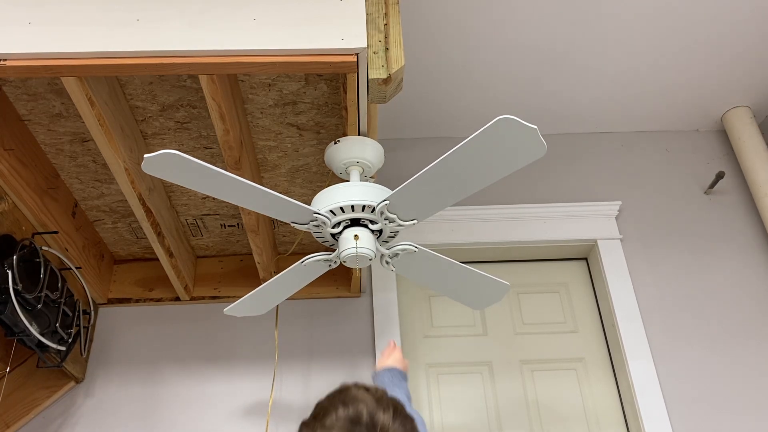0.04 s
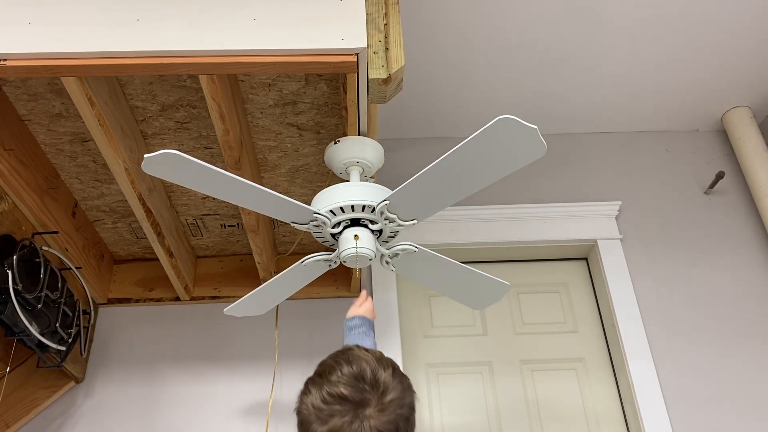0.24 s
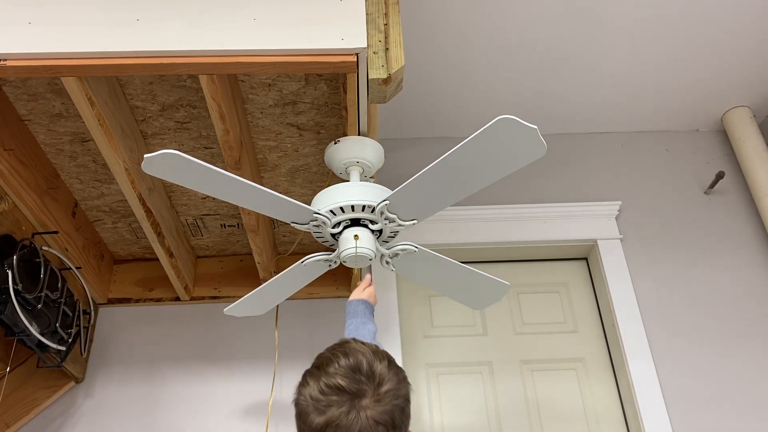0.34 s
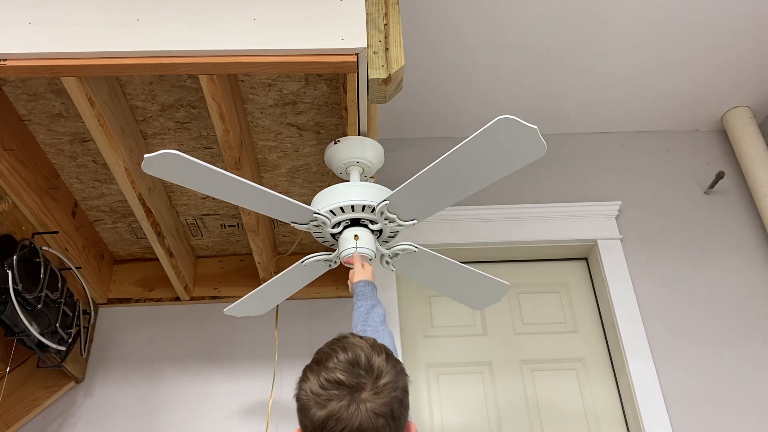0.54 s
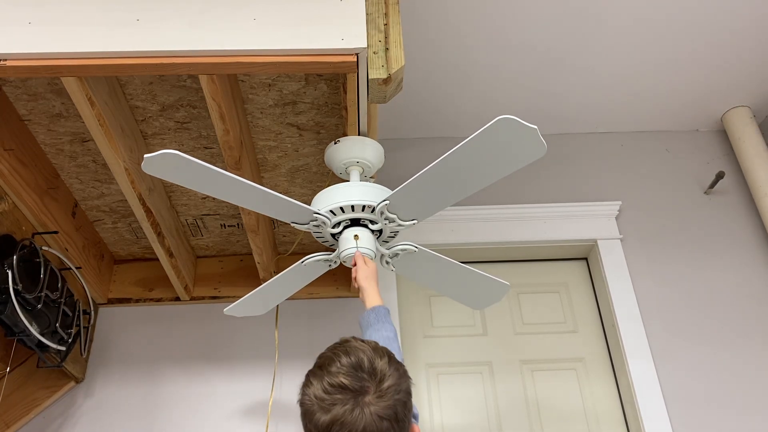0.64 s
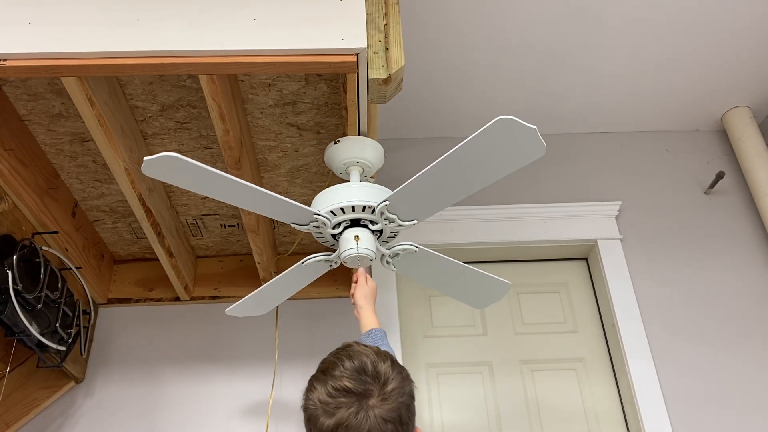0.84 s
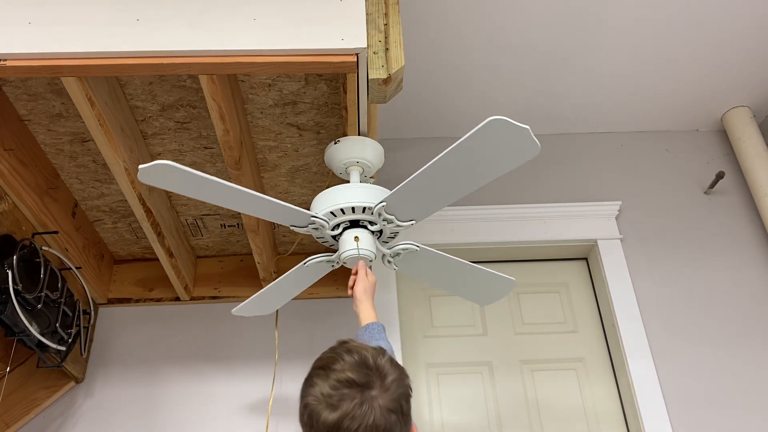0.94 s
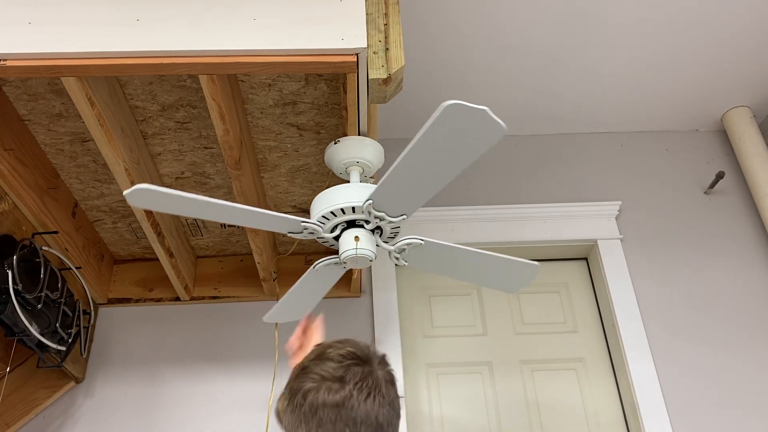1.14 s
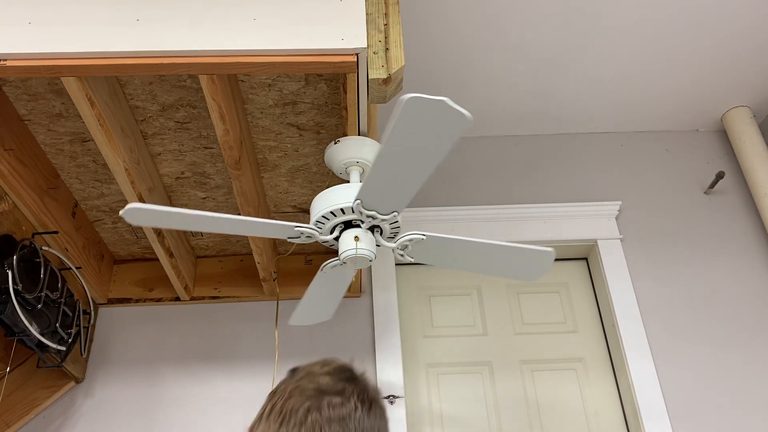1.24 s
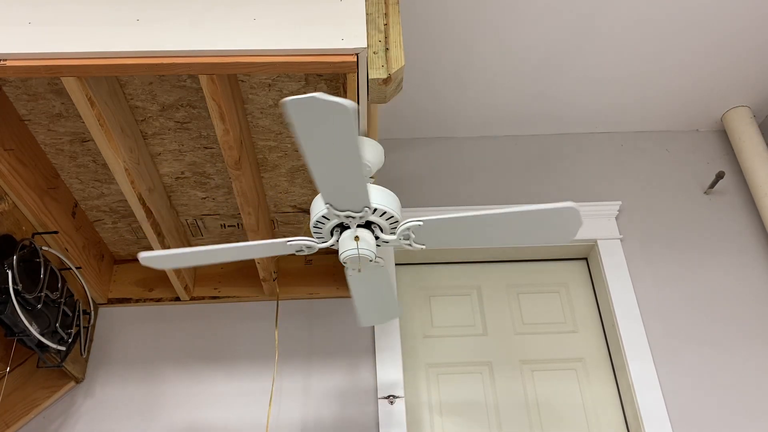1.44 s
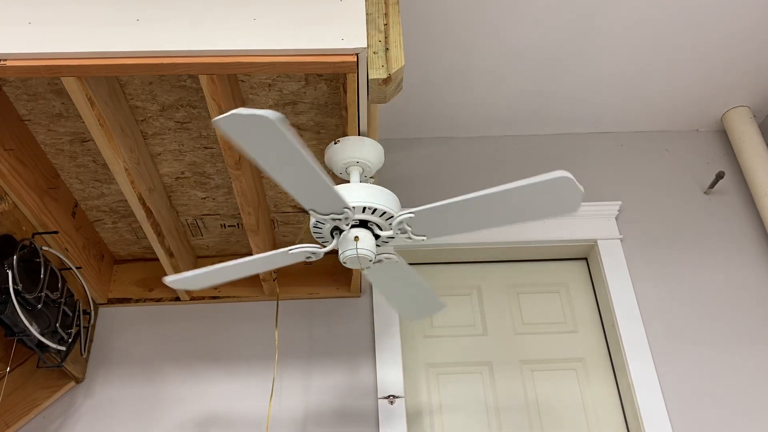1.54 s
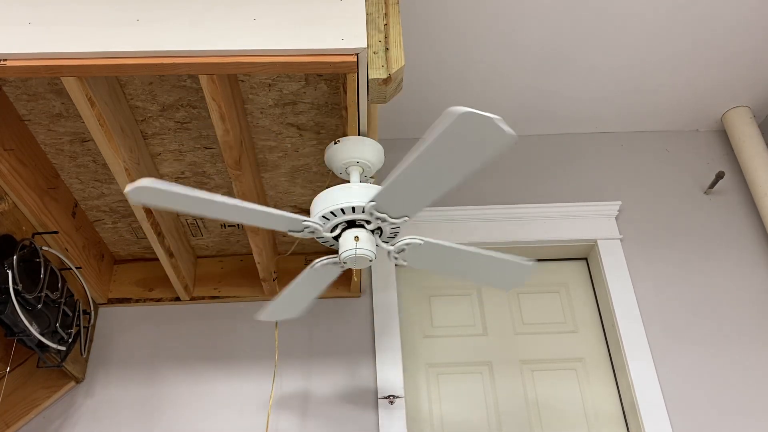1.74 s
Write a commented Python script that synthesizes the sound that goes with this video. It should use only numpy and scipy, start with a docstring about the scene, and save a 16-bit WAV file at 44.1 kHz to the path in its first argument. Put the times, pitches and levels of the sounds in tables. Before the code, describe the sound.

Ceiling fan chain being pulled: first a boomy foot thump on a hollow step, then small clicks and one loud snap, a lighter knock and slight rustle, heard close up in a quiet, lightly echoing room.

```python
"""Hollow step and ceiling fan pull chain

A quiet bare room: a foot thumps on a hollow wooden step, a hand tugs a ceiling fan's pull chain so that
the switch ticks and snaps and the fan's mount booms, then the foot steps down. Clothes rustle, the fan
motor's low hum wavers. Thuds, ticks and rustle are shaped noise; board, housing and booms decaying sines.
Two close microphones: alike in the bass and top, apart in the middle, the left lagging in the treble."""
import sys
import numpy as np
from scipy import signal
from scipy.fft import rfft, irfft, next_fast_len
from scipy.io import wavfile
from scipy.ndimage import map_coordinates

SR = 44100
rng = np.random.default_rng(int(sys.argv[2]) if len(sys.argv) > 2 else 0)


def transcribe(signal):
    """Save signal, clipped to [-1, 1], as a 16-bit WAV file at the path in sys.argv[1]."""
    frames = np.atleast_2d(signal).T
    limited = np.clip(frames, -1, 1)
    pcm = np.round(limited * 32767).astype(np.int16)
    wavfile.write(sys.argv[1], SR, pcm)


def rack_gain(trim_db):
    """Turn a fader trim in dB into the linear factor to multiply a signal by."""
    fader = np.asarray(trim_db, float)
    return 10 ** (fader / 20)


N = 79380  # 1.8 s


def unit(x):
    """Scale x to an rms of 1."""
    return x / np.sqrt(np.mean(x ** 2) + 1e-20)


def along(points, hz):
    """Read a curve of (frequency [Hz], value) points on a log frequency axis."""
    point_hz, value = np.transpose(points)
    return np.interp(np.log(hz + 1), np.log(point_hz + 1), value)


def wobble(rate):
    """A smooth random curve with rate knots a second."""
    knots = rng.standard_normal(int(N * rate / SR) + 4)
    return map_coordinates(knots, [np.arange(N) * rate / SR])


def filtered(x, response):
    """Multiply the spectrum of x by a complex response of frequency."""
    size = next_fast_len(x.shape[-1] + 8192)
    spectrum = rfft(x, size) * response(np.fft.rfftfreq(size, 1 / SR))
    return irfft(spectrum, size)[..., :x.shape[-1]]


def noise(colour, size=N, tilt_db=0, knee_hz=3000):
    """Two unrelated coloured noises of rms 1, tilted by tilt_db per octave above the knee."""
    def gain(hz):
        octaves = np.log2(np.maximum(hz, knee_hz) / knee_hz)
        return rack_gain(along(colour, hz) + tilt_db * octaves)
    return unit(filtered(rng.standard_normal((2, size)), gain))


def fade(t, rise, t60):
    """Smooth rise with time constant rise [s], exponential decay of 60 dB in t60 [s]."""
    t = np.maximum(t, 0)
    return (1 - np.exp(-t / rise)) ** 2 * rack_gain(-60 * t / t60)


def dying(x, rises, t60s):
    """Each half-octave band of x rises and dies at its own speed."""
    t = np.arange(x.shape[-1]) / SR
    out = 0
    for centre in 2 ** (np.arange(9, 29) / 2):
        band = filtered(x, lambda hz: np.clip(1 - 2 * np.abs(np.log2((hz + 1) / centre)), 0, 1))
        out = out + band * fade(t, along(rises, centre), along(t60s, centre))
    return out


def ringing(modes, t, focus_hz):
    """Struck modes as damped sines, strongest near focus_hz; a second view lies a quarter cycle apart."""
    focus_loss_db = 4.5  # per octave away from the most excited pitch
    quarter = np.array([[0], [np.pi / 2]])
    out = 0
    for hz, db, t60 in modes:
        level_db = db + rng.normal(0, 1.5) - focus_loss_db * abs(np.log2(hz / focus_hz))
        phase = quarter + rng.uniform(0, 2 * np.pi)
        out = out + rack_gain(level_db) * fade(t, 0.00068, t60) * np.sin(2 * np.pi * hz * t + phase)
    return out


def add(out, s, x):
    """Mix x in from time s [s]."""
    at = out[:, round(s * SR):][:, :x.shape[1]]
    at += x[..., :at.shape[1]]


# footfalls: (time [s], level [dB], brightness [dB per octave above the knee], slap and board level [dB],
#             most excited board pitch [Hz], share of the full decay time)
FOOTFALLS = [(0.242, -28, -1.5, 2.5, 780, 1.01), (0.56, -51, -1.5, -15, 600, .8),
             (0.775, -47, -8, -3, 420, 0.77), (1.457, -37, -3, -2, 1310, 0.75),
             (1.57, -51, -1.5, -24, 600, 1.4), (1.66, -51.5, 0, -12, 800, 0.82)]
# colour of the thud: (frequency [Hz], relative density [dB per Hz])
THUD_COLOUR = [(21, -34), (35, -6.5), (173, -7), (772, -12.5), (1130, -25), (1280, -19), (7560, -40.5),
               (9030, -43), (11100, -41.5), (13200, -44), (15000, -53)]
# full decay of the thud: (frequency [Hz], t60 [s])
THUD_T60 = [(40, 1), (120, 0.42), (400, 0.59), (1500, 0.52), (5000, 0.53), (14000, 0.41)]
# onset of the thud, the bass blooming late: (frequency [Hz], rise [s])
THUD_RISE = [(40, 0.02), (120, 0.016), (300, 0.0054), (600, 0.001), (2000, 0.00041)]
# modes of the board under the foot: (frequency [Hz], level [dB], t60 [s])
BOARD_MODES = [(496, -3, 0.097), (600, -3.5, 0.13), (687, 3, .05), (780, 0, 0.099), (1133, -9.5, 0.086),
               (1343, -3.5, 0.07), (1484, -1, 0.048), (1787, -12, 0.062), (2300, -9, 0.073),
               (3800, -16, 0.033)]
# colour of the sole's first contact: (frequency [Hz], relative density [dB per Hz])
SOLE_COLOUR = [(400, -45), (1200, 0), (3500, -5.5), (6000, -16.5), (15500, -14)]


def steps():
    """The sole slaps, the board knocks as ringing modes, then floor and room answer with a thud."""
    slap_db, slap_t60_s = -2, 0.015
    slap_dulls = 2.6  # the slap tilts this much more steeply than the thud
    out, t = np.zeros((2, N)), np.arange(SR // 2) / SR
    for s, db, tilt_db, knock_db, focus_hz, share in FOOTFALLS:
        t60s = [(hz, share * t60) for hz, t60 in THUD_T60]
        thud = dying(noise(THUD_COLOUR, len(t), tilt_db, knee_hz=430), THUD_RISE, t60s)
        slap = noise(SOLE_COLOUR, len(t), slap_dulls * tilt_db, knee_hz=1900)
        slap = slap * fade(t, 0.00038, slap_t60_s)
        board = ringing(BOARD_MODES, t, focus_hz) * [[1], [0.4]]  # weaker in the second view
        knock = rack_gain(knock_db) * (board + rack_gain(slap_db) * slap)
        add(out, s, rack_gain(db) * (thud + knock))
    return out


# switch and chain: (time [s], level [dB], brightness [dB per octave above 3 kHz],
#                    ring of the housing [dB], most excited housing pitch [Hz])
SWITCH_TICKS = [(0.582, -49.5, -11, -10.5, 2400), (0.7441, -40.5, -5.5, -13.5, 3080),
                (0.770, -36, -7.5, -13, 2520), (0.782, -40.5, 4, -12, 3000), (0.7867, -34, -5.5, -11, 3070),
                (0.903, -40, 4.5, -16, 2510), (0.938, -37.5, 2, -13, 3100), (0.964, -20.5, 1, -16, 2250),
                (0.972, -31, -2.5, -15.5, 2100), (0.981, -41, -1.5, -10, 2300)]
# colour of the crack: (frequency [Hz], relative density [dB per Hz])
CRACK_COLOUR = [(290, -32), (500, -27.5), (1400, -9), (1620, -10), (1840, -15), (2260, -10.5), (2540, -15),
                (7310, -14), (16000, -15)]
# modes of the switch housing: (frequency [Hz], level [dB], t60 [s])
HOUSING_MODES = [(1104, -4.5, 0.059), (1631, 3.5, 0.043), (2308, 0.5, 0.035), (2630, -7, 0.023),
                 (2955, -0.5, .04), (3214, 1.5, 0.034), (3766, -2, 0.041), (5040, -3, 0.036),
                 (7280, -9, 0.025), (7540, 0, 0.024), (7978, 7.5, 0.015)]
# decay of the room's tail: (frequency [Hz], t60 [s])
TAIL_T60 = [(500, 0.39), (3000, 0.56), (8000, 0.5), (15000, 0.14)]


def ticks():
    """A noise crack and the housing's ring, and both again convolved with the room's tail."""
    rise_s, crack_t60_s, room_db = 0.001, 0.02, -5.5
    out, t = np.zeros((2, N)), np.arange(SR // 2) / SR
    for s, db, tilt_db, ring_db, focus_hz in SWITCH_TICKS:
        crack = noise(CRACK_COLOUR, len(t), tilt_db) * fade(t, rise_s, crack_t60_s)
        direct = crack + rack_gain(ring_db) * ringing(HOUSING_MODES, t, focus_hz)
        room = dying(rng.standard_normal((2, len(t))), [(1000, 0.0013)], TAIL_T60)
        room = room / np.linalg.norm(room[0])
        tail = signal.fftconvolve(direct[:1], room, axes=1)[:, :len(t)]
        add(out, s - rise_s, rack_gain(db) * (direct + rack_gain(room_db) * tail))  # the rise leads the listed time
    return out


# low booms of floor and ceiling: (time [s], frequency [Hz], level before doubling [dB], rise [s], t60 [s])
LOW_BOOMS = [(0.101, 116, -71, 0.067, 0.19), (0.25, 180, -40, 0.031, 0.28), (0.259, 140, -34, 0.018, 0.34),
             (0.27, 302.6, -31.5, 0.036, 0.28), (0.27, 44.1, -38, 0.024, 0.23),
             (0.329, 78.56, -24.5, 0.074, 0.32), (0.568, 73.56, -49.5, 0.015, 0.72),
             (0.569, 120, -53, 0.017, 0.57), (0.783, 72, -32, 0.039, 0.45), (0.79, 173.6, -41, 0.019, 0.32),
             (0.789, 319.3, -45.5, 0.0095, 0.14), (0.869, 119.9, -39.5, 0.013, 0.31),
             (1.6, 44, -51, 0.014, 0.88), (1.69, 78.7, -39.5, .03, 0.21)]


def booms():
    """Single low resonances of floor and ceiling swell and die as sines."""
    t, quarter = np.arange(N) / SR, np.array([[0], [np.pi / 2]])
    out = np.zeros((2, N))
    for s, hz, db, rise, t60 in LOW_BOOMS:
        phase = quarter + rng.uniform(0, 2 * np.pi)
        out += 2 * rack_gain(db) * fade(t - s, rise, t60) * np.sin(2 * np.pi * hz * t + phase)
    return out


# strokes of clothes and chain: (start [s], length [s], level [dB])
STROKES = [(0.0, .2, -72), (0.533, 0.1, -69), (0.745, 0.077, -56.5), (0.923, 0.045, -58), (1.3, .14, -75),
           (1.492, 0.13, -69), (1.668, 0.048, -59.5), (1.726, 0.065, -69)]
# colour of the rustle: (frequency [Hz], relative density [dB per Hz])
CLOTH_COLOUR = [(600, -3.5), (1500, -8.5), (2600, 1.5), (3400, -8.5), (4500, -2.5), (7000, -11),
                (15500, -6.5)]


def rustle():
    """Friction of clothes and chain: rough hiss in soft-edged strokes."""
    edge_s, rough_db = 0.016, 2
    t = np.arange(N) / SR

    def edge(u):
        return 0.5 + 0.5 * np.tanh(u / edge_s)

    level = sum(rack_gain(db) * edge(2 * (t - s)) * edge(s + length - t) for s, length, db in STROKES)
    roughness = rack_gain(rough_db * wobble(120))
    return level * roughness * noise(CLOTH_COLOUR)


# colour of the air, its last row left unplayed: (frequency [Hz], relative density [dB per Hz])
AIR_COLOUR = [(12, -70), (20, -6), (129, -3.5), (319, -19), (830, -21.5), (938, -23), (1490, -23.5),
              (1650, -22.5), (2690, -31.5), (7000, -41.5), (9100, -42), (15400, -120)]
# top of the air, played in place of that row: (frequency [Hz], relative density [dB per Hz])
AIR_TOP = [(10000, -43), (16000, -49)]
# low hum of the fan motor: (frequency [Hz], level before a 3.5 dB lift [dB])
HUM_TONES = [(70.0, -68), (118.4, -64)]


def room_tone():
    """Air noise of gently drifting level, and the fan motor's hum tones wavering in level and phase."""
    air_db, air_drift_db, hum_waver_db = -56, 1.55, 4.5
    t = np.arange(N) / SR
    hum = 0
    for hz, db in HUM_TONES:
        level = rack_gain(db + 3.5 + hum_waver_db * wobble(13))
        hum = hum + level * np.sin(2 * np.pi * hz * t + 0.27 * wobble(8.08))
    air = rack_gain(air_db + air_drift_db * wobble(3.666)) * noise(AIR_COLOUR[:-1] + AIR_TOP)
    return air + hum


# likeness of the two microphones: (frequency [Hz], left-right correlation)
LIKENESS = [(100, .96), (200, 0.89), (450, 0.33), (1200, 0.033), (3300, 0.63), (5500, 0.37), (7000, .999)]


def microphones(pair):
    """Two views become sum and difference, weighted by pitch to set how alike left and right are."""
    def weights(hz):
        angle = np.arccos(np.clip(along(LIKENESS, hz), -1, 1)) / 2
        return np.array([np.cos(angle), np.sin(angle)])
    mid, side = filtered(pair, weights)
    return np.array([mid + side, mid - side])


def scene():
    """Foot, switch, booms, rustle and room, heard by the two microphones."""
    return microphones(steps() + ticks() + booms() + rustle() + room_tone())


def top_cut(x):
    """Nothing passes above the cut-off."""
    return signal.sosfilt(signal.butter(12, 16810, fs=SR, output="sos"), x)


def record(dry):
    """The left treble lags the right, and the band ends at the top."""
    lag_from_hz, lag_s, top_hz = 7110, 0.00026, 16600

    def lag(hz):
        half_turn = np.pi * lag_s * np.maximum(hz - lag_from_hz, 0)  # left late, right early by half each
        return (hz < top_hz) * np.exp(1j * half_turn * np.array([[-1], [1]]))

    mix = filtered(dry, lag)
    return top_cut(mix)


dry = scene()
out = record(dry)
transcribe(out)
```